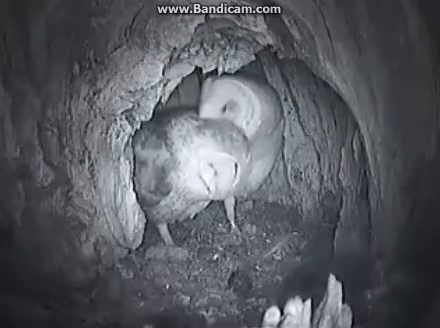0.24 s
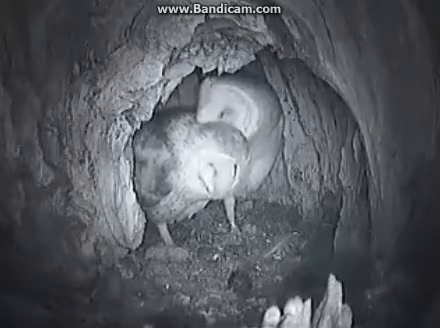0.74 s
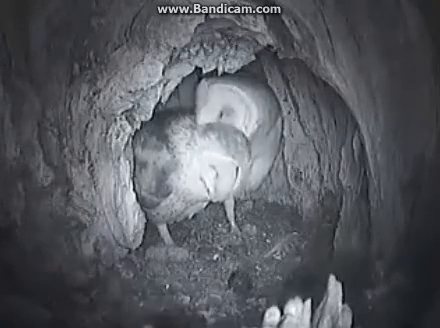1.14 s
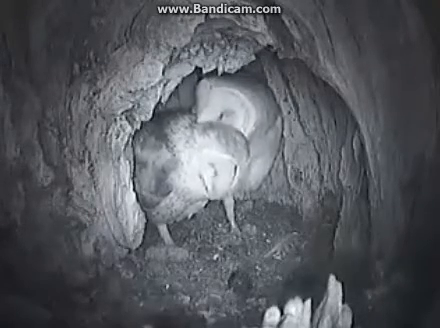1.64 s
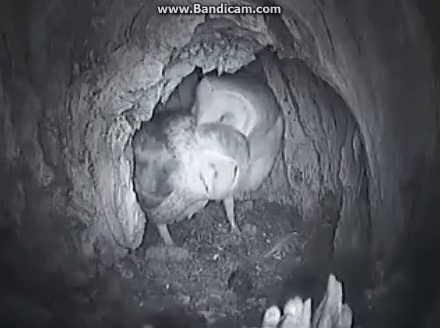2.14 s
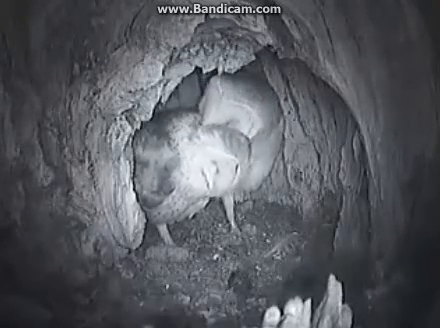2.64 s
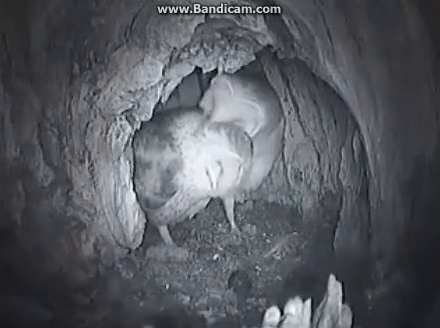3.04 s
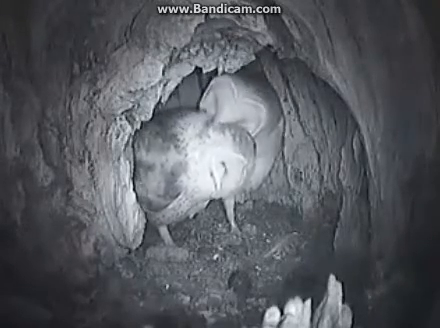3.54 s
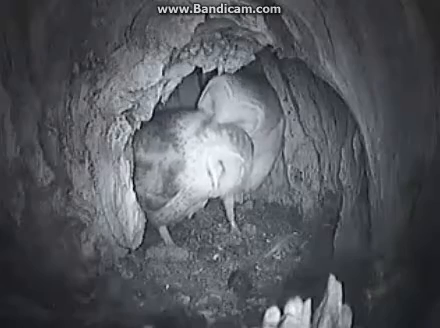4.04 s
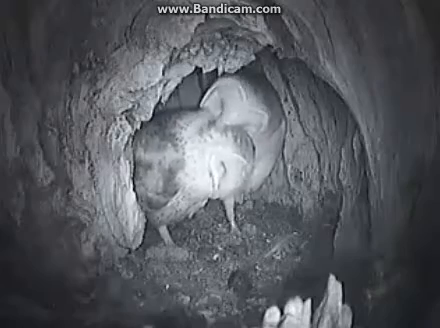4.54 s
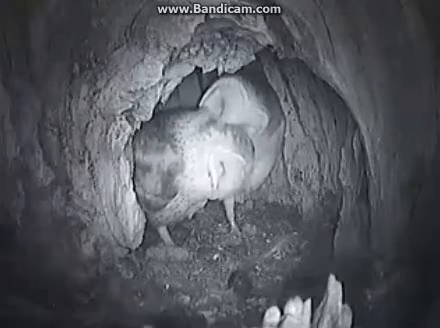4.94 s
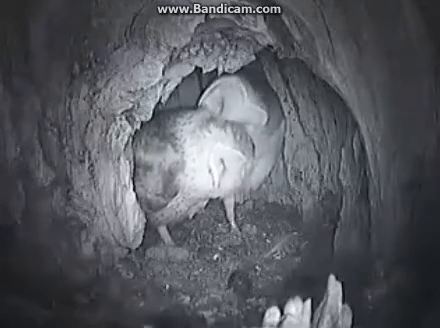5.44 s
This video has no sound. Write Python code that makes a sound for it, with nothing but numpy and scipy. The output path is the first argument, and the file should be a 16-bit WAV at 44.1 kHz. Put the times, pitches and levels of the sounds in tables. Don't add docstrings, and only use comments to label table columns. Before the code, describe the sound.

A constant, slightly raspy low electrical hum fills a quiet owl nest, with wide hiss and a deep, uneven rumble of air outside. Around three seconds there is a small click and a barely audible peep. Shortly before four seconds the level dips, then rises quickly to a louder hum and hiss that holds until a slight fade at the end. The microphone is fixed, with high gain and narrow, compressed sound.

```python
import sys
import numpy as np
from scipy import signal
from scipy.fft import rfft, irfft
from scipy.io import wavfile
from scipy.ndimage import uniform_filter1d

SR = 44100
rng = np.random.default_rng(int(sys.argv[2]) if len(sys.argv) > 2 else 0)


def int16_out(signal):
    q = np.round(np.clip(np.atleast_2d(signal).T, -1, 1) * 32767)
    wavfile.write(sys.argv[1], SR, q.astype(np.int16))


def decibels_to_gain(level_db):
    exponent = np.asarray(level_db, float) / 20
    return 10 ** exponent


N = 251370
DROP_AT, DROP = round(3.1238 * SR), 1024
LONG = N + DROP


def evened(x):
    return x / np.sqrt(np.mean(x ** 2))


def coloured(points):
    hz = np.fft.rfftfreq(LONG, 1 / SR)
    point_hz, point_db = np.transpose(points)
    density_db = np.interp(np.log(hz + 1), np.log(point_hz), point_db, right=-160)
    white = rfft(rng.standard_normal(LONG))
    return irfft(white * decibels_to_gain(density_db) * np.sqrt(SR / 2), LONG)


def patchy(x, patchy_db, size):
    spectrum = signal.stft(x, nperseg=512)[2]
    field = rng.standard_normal(spectrum.shape)
    field = uniform_filter1d(field, size[0], axis=0)
    field = evened(uniform_filter1d(field, size[1], axis=1))
    out = signal.istft(spectrum * decibels_to_gain(patchy_db * field), nperseg=512)[1][:LONG]
    return evened(out) * np.std(x)


def preamp_hiss():
    # frequency in Hz, density in dB per Hz.
    hiss_spectrum = [(12, -64), (50, -68.5), (90, -65.5), (600, -69), (1000, -69.5), (2000, -71),
                     (3000, -71.5), (3400, -71.5), (3650, -68.5), (3900, -67.5), (3995, -70.5),
                     (4030, -110)]
    return patchy(coloured(hiss_spectrum), 0.77, size=(6, 8))


def rebuilt_band():
    # frequency in Hz, density in dB per Hz.
    treble_spectrum = [(3950, -110), (3990, -74), (4800, -80.5), (5200, -79), (5450, -82), (5800, -82),
                       (6350, -86), (6375, -80.5), (7280, -81), (7295, -101), (7800, -112), (8300, -122)]
    skirt_edges = [7600, 7780, 7780, 7950, 7950, 8120, 8290]
    frame_s, frame_dip_s = 512 / 16000, 0.0075
    centre_hz, drift_hz, width_hz, ridge_db = 5480, 60, 150, 9

    noise = patchy(coloured(treble_spectrum), 1.53, size=(8, 6))
    hz, t, spectrum = signal.stft(noise, SR, nperseg=1024)
    frame = (t / frame_s).astype(int)
    wander = rng.standard_normal((2, frame[-1] + 1))
    drift, lift = evened(uniform_filter1d(wander, size=2))[:, frame]
    off_centre = (hz[:, None] - centre_hz - drift_hz * drift) / width_hz
    spectrum *= decibels_to_gain((ridge_db + lift) / (1 + off_centre ** 2))

    edge_hz = np.repeat(rng.choice(skirt_edges, len(t)), 3)[:len(t)]
    spectrum *= hz[:, None] < edge_hz

    since_dip_s = np.arange(LONG) / SR - frame_dip_s
    sag_db = -2.4 * np.cos(2 * np.pi * since_dip_s / frame_s)
    return signal.istft(spectrum, SR, nperseg=1024)[1][:LONG] * decibels_to_gain(sag_db)


def peep():
    start_s, hz, length_s, peak_db = 3.262, 1965, 0.02, -35
    t = np.arange(N) / SR - start_s
    envelope = decibels_to_gain(peak_db) * np.exp(-(2 * t / length_s) ** 2)
    return envelope * np.sin(2 * np.pi * hz * t)


def air_rumble():
    # centre in Hz, fall below and fall above in dB an octave.
    layer_shapes = [
        (102, 15, 12.5),
        (199, 16.5, 16.5),
        (339, 20.5, 15),
    ]
    # share of the swell, offset in dB, dB per unit of brightness.
    layer_follow = [
        (.5, -1.5, -6),
        (1.45, 1, 2),
        (.8, -2.5, 3.5),
    ]
    # time in seconds, strength in dB, brightness from -1 (deep) to 1 (bright).
    air_swells = [(0.0, -34.5, -0.35), (0.3, -34.5, .2), (0.65, -33.5, 0.87), (1.05, -31, 0.73),
                  (1.4, -31, 0), (1.7, -32.5, .1), (2.0, -32, -0.55), (2.4, -32, .1), (2.85, -32.5, 0.12),
                  (3.3, -35.5, -.6), (3.7, -35.5, 0), (4.05, -38, -0.66), (4.4, -34, -0.4),
                  (4.6, -36.5, -0.24), (4.85, -34, -.7), (5.2, -34, -0.036), (5.5, -34, 0.23),
                  (5.7, -29.5, .7)]
    calm_db, lump_db, lump_s = -32.5, 1, 0.12

    swell_s, strength_db, brightness = np.transpose(air_swells)
    at = np.arange(LONG)
    t = (at - DROP * (at > DROP_AT)) / SR
    swell_db = np.interp(t, swell_s, strength_db) - calm_db
    bright = np.interp(t, swell_s, brightness)

    out = np.zeros(LONG)
    for (hz, below_db, above_db), (share, offset_db, bright_db) in zip(layer_shapes, layer_follow):
        shape = [(hz / 8, -3 * below_db), (hz / 1.194, 0), (hz * 1.134, 0), (hz * 8, -3 * above_db)]
        lumps = np.interp(t / lump_s, np.arange(200), rng.standard_normal(200))
        level_db = calm_db + offset_db + share * swell_db + bright_db * bright + lump_db * lumps
        out += evened(coloured(shape)) * decibels_to_gain(level_db)
    return out


def mains_buzz():
    # multiple of the mains frequency, level in dB rms.
    harmonics = [(1, -38.7), (2, -50.4), (3, -38.7), (4, -66.5), (5, -36.7), (7, -38.1), (9, -43.6),
                 (11, -50.3), (13, -56.7), (15, -52.7), (17, -55.5), (19, -61.3), (21, -71.7), (23, -60.9),
                 (25, -59.0), (27, -61.3), (29, -61.4), (31, -65.4), (33, -65.9), (35, -61.7), (37, -66.4),
                 (39, -74.1)]
    mains_hz = 59.984
    start_phase, lead_per_multiple = 0.9, 0.56
    turn = 2 * np.pi * mains_hz * np.arange(LONG) / SR
    out = np.zeros(LONG)
    for multiple, db in harmonics:
        phase = start_phase + lead_per_multiple * multiple
        out += np.sqrt(2) * decibels_to_gain(db) * np.cos(multiple * turn + phase)
    return out


def lose_block(stream):
    jump, settle_s = 0.06, 0.004
    stream = np.delete(stream, np.arange(DROP_AT, DROP_AT + DROP))
    settle = np.exp(-np.arange(N - DROP_AT) / (settle_s * SR))
    stream[DROP_AT:] += (jump + stream[DROP_AT - 1] - stream[DROP_AT]) * settle
    return stream


def scene():
    resting_voltage = -0.0094
    stream = mains_buzz() + air_rumble() + preamp_hiss() + rebuilt_band() + resting_voltage
    return (lose_block(stream) + peep())[None]


def playback_volume():
    dip_s, dip_width_s, dip_db = 3.82, 0.11, -2.8
    step_s, step_rise_s, step_db = 3.985, 0.031, 6.5
    fade_s, fade_db_per_s = 5.57, -13
    t = np.arange(N) / SR
    dip = dip_db * np.exp(-((t - dip_s) / dip_width_s) ** 2)
    step_up = step_db / (1 + np.exp(-(t - step_s) / step_rise_s))
    fade = fade_db_per_s * np.maximum(t - fade_s, 0)
    return decibels_to_gain(dip + step_up + fade)


def top_cut(x):
    return signal.sosfilt(signal.butter(12, 15900, fs=SR, output="sos"), x)


def record(dry):
    output_voltage = -0.0052
    played = dry * playback_volume() + output_voltage
    return top_cut(played)


dry = scene()
out = record(dry)
int16_out(out)
```